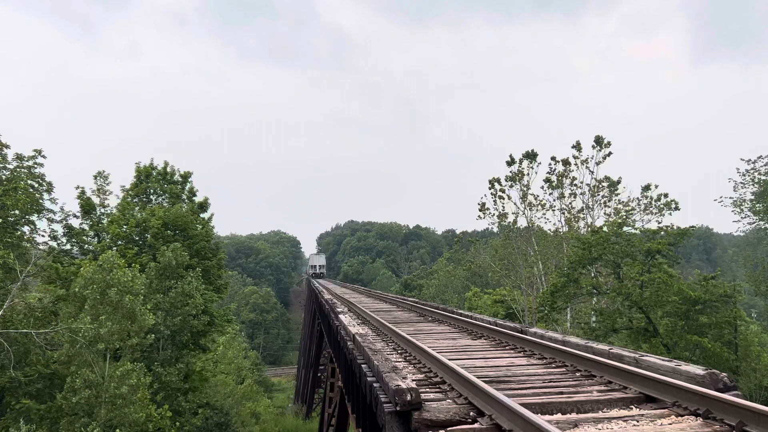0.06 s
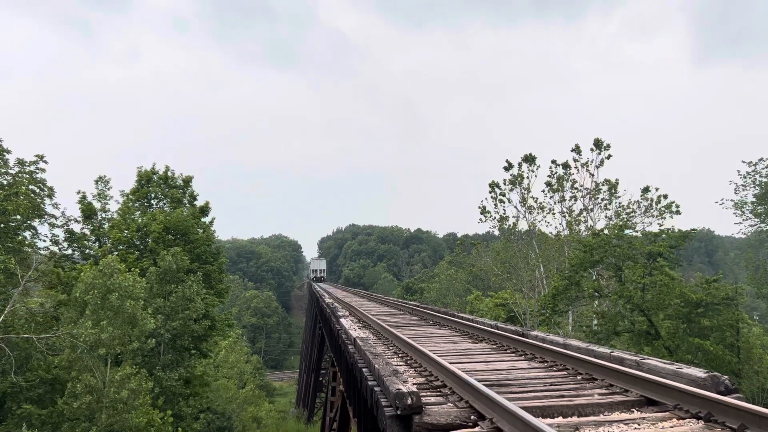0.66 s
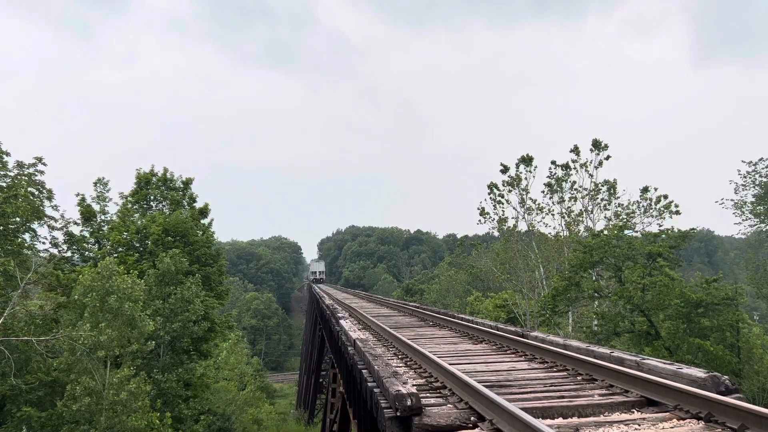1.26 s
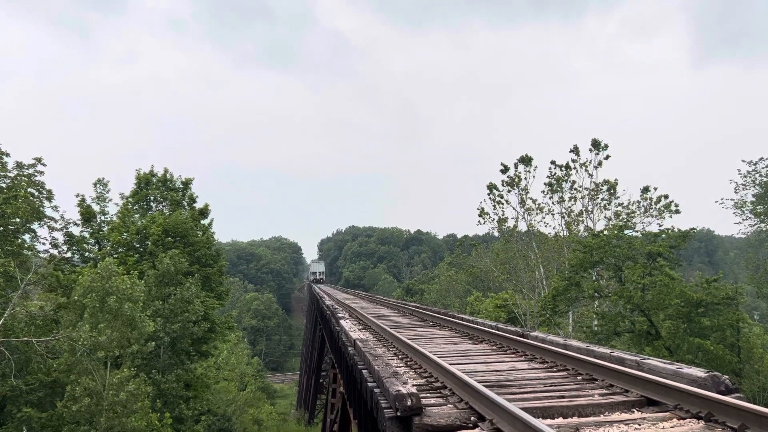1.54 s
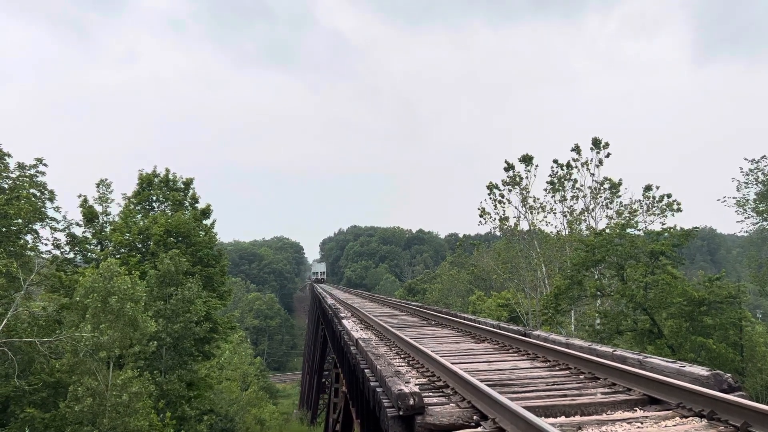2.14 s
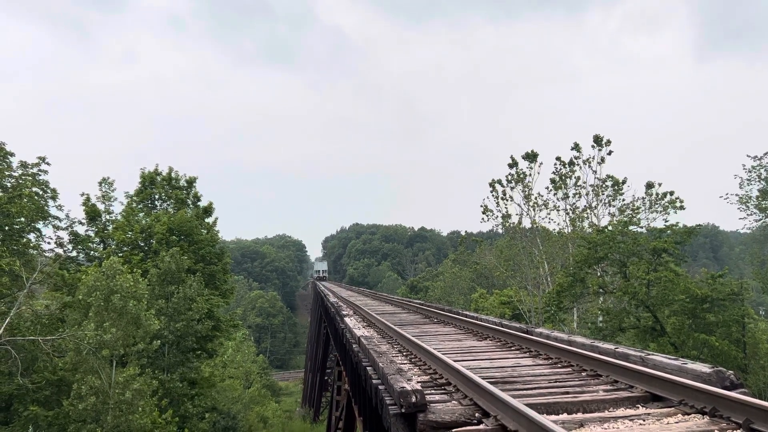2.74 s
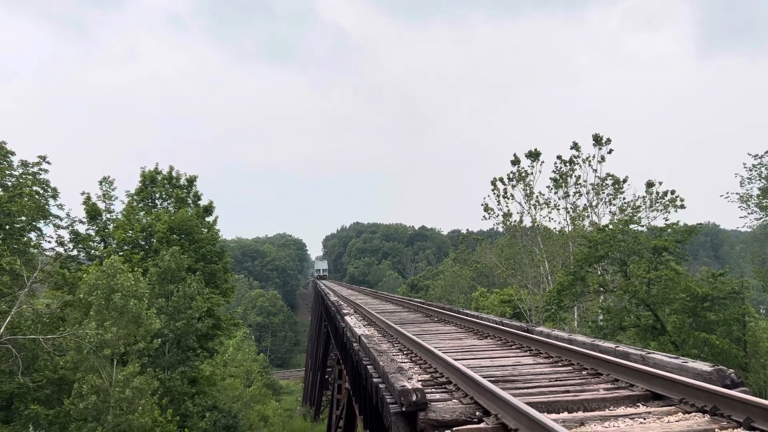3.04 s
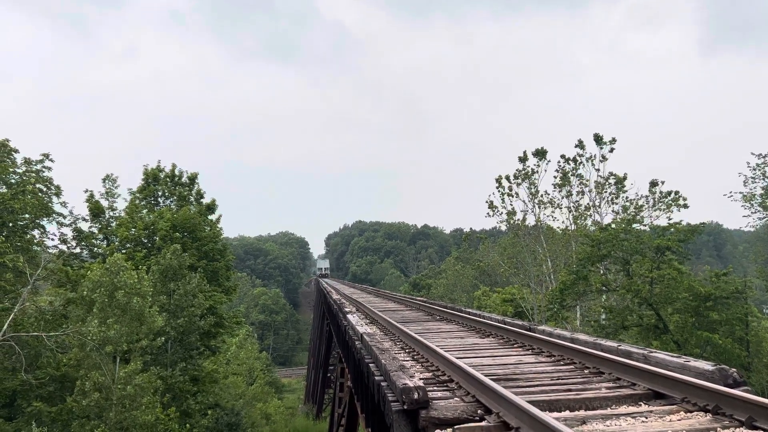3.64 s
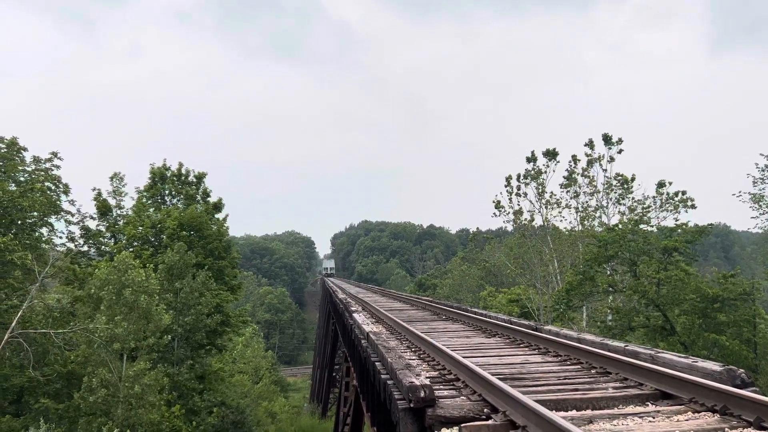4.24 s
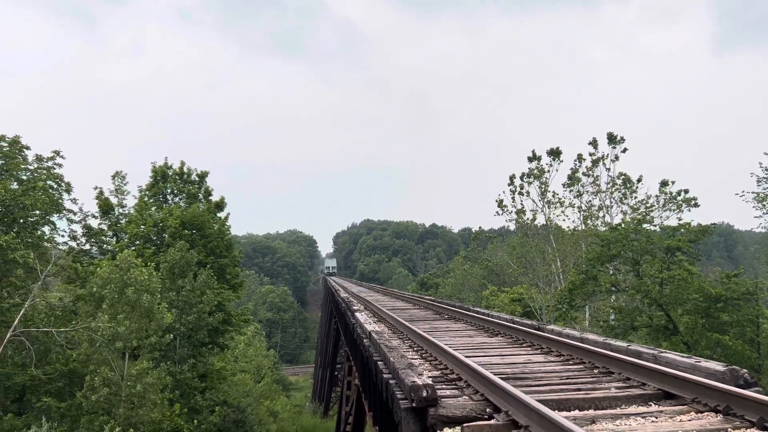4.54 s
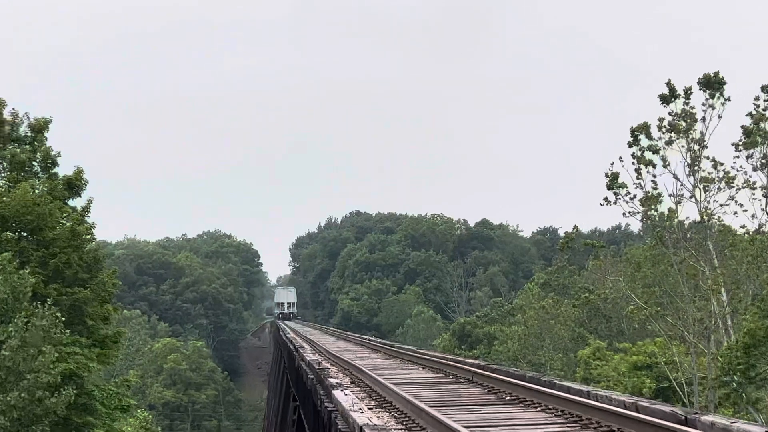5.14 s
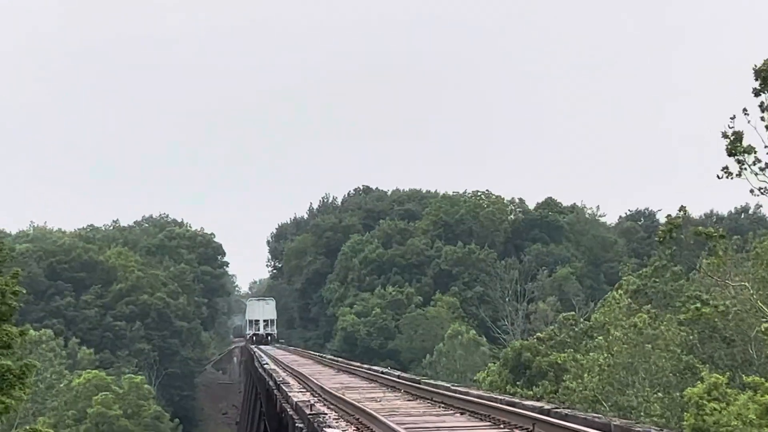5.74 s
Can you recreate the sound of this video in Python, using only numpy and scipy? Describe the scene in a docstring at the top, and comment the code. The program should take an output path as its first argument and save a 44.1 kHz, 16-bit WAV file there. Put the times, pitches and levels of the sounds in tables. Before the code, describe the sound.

Outdoors among trees, a hand-held microphone picks up the low, steady rumble and hiss of a far freight train, swelling twice. Faint metallic ringing, a few high pings and small bird chirps sit over it, with light wind buffeting close up. Late on, a sharp handling click sounds on the left, a sparrow begins a quiet, rapid trill, and the stereo picture narrows.

```python
"""A freight train rolls away beyond a steel trestle, heard outdoors from a distance on a hand-held camera.
The bridge rumbles, the wheels roar and squeal thinly, the rails ring faintly and give a few high pings.
Birds call in the trees and a sparrow starts a fast trill. Close up, over a faint hiss, a breeze buffets
the two microphone ports; the camera is tapped and bumped, then zooms in, narrowing its stereo picture."""
import sys
import numpy as np
from scipy import signal
from scipy.fft import rfft, irfft, next_fast_len
from scipy.io import wavfile
from scipy.ndimage import uniform_filter1d, map_coordinates

SR = 44100
rng = np.random.default_rng(int(sys.argv[2]) if len(sys.argv) > 2 else 0)


def store_wav(level_fs):
    """Save 16-bit WAV to argv[1]."""
    pcm = np.round(np.clip(np.atleast_2d(level_fs), -1, 1) * 32767)
    wavfile.write(sys.argv[1], SR, pcm.T.astype(np.int16))


N = 255339
TOP_HZ = 15700  # the camera's band limit


def amp(db):
    """Decibels to gain."""
    return 10 ** (np.asarray(db) / 20)


def unit(x):
    """Scaled to rms 1."""
    return x / np.sqrt(np.mean(x ** 2) + 1e-20)


def along(points, hz):
    """(f/Hz, value) points read on a log frequency axis."""
    f, v = np.transpose(points)
    return np.interp(np.log(hz + 1), np.log(f + 1), v)


def curves(rows, size=N):
    """One value per sample for each column after the time."""
    s, *cols = np.transpose(rows)
    return [np.interp(np.arange(size) / SR, s, c) for c in cols]


def wobble(per_s):
    """A smooth random curve with per_s knots a second."""
    return map_coordinates(rng.standard_normal(int(N * per_s / SR) + 4), [np.arange(N) * per_s / SR])


def fading(db, db_per_s):
    """A level in dB that falls steadily."""
    return db - db_per_s * np.arange(N) / SR


def swells(rows, floor_db):
    """Gain of bell-shaped swells (peak t/s, level/dB, rise/s, fall/s) over a floor."""
    t = np.arange(N) / SR
    power = sum(amp(db) ** 2 * np.exp(-((t - s) / np.where(t < s, rise, fall)) ** 2)
                for s, db, rise, fall in rows)
    return np.sqrt(power + amp(floor_db) ** 2)


def filtered(x, response):
    """x times a response of frequency."""
    m = next_fast_len(N + SR // 2)
    return irfft(rfft(x, m) * response(np.fft.rfftfreq(m, 1 / SR)), m)[..., :N]


def shaped(x, spectrum):
    """x through a curve of (f/Hz, gain/dB) points."""
    return filtered(x, lambda hz: amp(along(spectrum, hz)))


def noise(spectrum):
    """Mono noise of rms 1 with the given spectrum."""
    return unit(shaped(rng.standard_normal(N), spectrum))


def narrow(centre_hz, width_hz):
    """Stereo noise of rms 1 from one randomly driven resonance."""
    drive = rng.standard_normal((2, N))
    return unit(filtered(drive, lambda hz: 1 / (1 + (2 * (hz - centre_hz) / width_hz) ** 2)))


def evened(x, samples, floor):
    """Stereo x divided by its running rms, with a floor added to the power."""
    return x / np.sqrt(np.abs(uniform_filter1d(np.mean(x ** 2, axis=0), size=samples)) + floor)


def add(track, s, sound):
    """Mix a sound into a track from time s on."""
    start = round(s * SR)
    part = sound[..., max(-start, 0):max(N - start, 0)]
    track[..., max(start, 0):max(start, 0) + part.shape[-1]] += part


def rush(spectrum, resonances, patchy_db):
    """Distant stereo noise of rms 1 through resonances, with drifting patches of gain."""
    # likeness of far sound at the two ports: f/Hz, correlation/-1..1
    likeness = [(60, 0.99), (170, 0.97), (350, 0.88), (650, 0.44), (870, -0.11), (1100, 0.23),
                (1500, -0.17), (1850, 0.74), (2250, 0.5), (3100, -0.31), (5200, -0.43), (7000, 0.37)]
    spectra = signal.stft(rng.standard_normal((2, N)), nperseg=512)[2]
    patches = uniform_filter1d(rng.standard_normal(spectra.shape[1:]), size=5, axis=0)
    patches = unit(uniform_filter1d(patches, size=16, axis=1))
    pair = signal.istft(spectra * amp(patchy_db * patches), nperseg=512)[1][:, :N]

    def response(hz):
        peaks_db = sum(db / (1 + (2 * (hz - centre) / width) ** 2) for centre, width, db in resonances)
        turn = np.arccos(np.clip(along(likeness, hz), -1, 1)) / 2
        return amp(along(spectrum, hz) + peaks_db) * [np.cos(turn), np.sin(turn)]

    mid, side = filtered(pair, response)
    return unit(np.array([mid + side, mid - side]))


def train():
    """Many far wheels blend into the trestle's rumble, a rolling roar and the hiss of the rails."""
    # spectra of rumble, roar and rails: f/Hz, relative level/dB
    rumble_band = [(20, -41), (32, -8.5), (47, 0), (62, 5.5), (76, -0.5), (95, 0), (125, -4.5),
                   (180, -23.5), (400, -118)]
    roar_band = [(60, -7), (130, 1), (190, 2), (260, -1.5), (330, 0.5), (480, -2), (650, -4), (800, -9),
                 (1000, -6.5), (1500, -11), (2200, -41.5), (5000, -82.5)]
    rail_band = [(600, -7), (1100, -3.5), (1600, 2), (2000, -1.5), (2450, -4), (2900, -9.5), (3800, -13),
                 (4900, -15.5), (6000, -21), (7500, -30), (8300, -37), (9200, -70)]
    # resonances of the trestle and of wheels and rails: f/Hz, width/Hz, lift/dB
    trestle_modes = [(81, 26, 7.5), (108.3, 4.1, 8.5), (151, 18.5, 6), (216.1, 16.4, 5)]
    wheel_modes = [(2210, 28, 3.1), (2438, 35, 4.9), (2940, 23, 2.3), (3070, 70, 2), (3820, 80, 2.9),
                   (4400, 92, 1.4), (4960, 190, 3.5)]
    # the rumble surges as the load shifts: peak t/s, level/dB, rise/s, fall/s
    surges = [(1.6, -32.5, 0.15, 0.26), (4.88, -32, 0.17, 0.64)]
    recede_db_per_s, sway_db = 0.0569, 0.6
    load = swells(surges, floor_db=fading(-31.5, db_per_s=1.3)) * amp(sway_db * wobble(per_s=12))
    rumble = rush(rumble_band, trestle_modes, patchy_db=3.5)
    rumble = evened(rumble, samples=8000, floor=1e-6)  # the heavy deck evens out single axles' blows
    roar = rush(roar_band, trestle_modes, patchy_db=0.78)
    rails = rush(rail_band, wheel_modes, patchy_db=1.55)
    flutter = wobble(per_s=9)  # moving air on the long path to the microphone
    roar_db = fading(-38, recede_db_per_s) + 1.1 * flutter
    rail_db = fading(-46.5, recede_db_per_s) + 0.2 * flutter
    return load * rumble + amp(roar_db) * roar + amp(rail_db) * rails


def wheel_squeal():
    """Far wheels squeal thinly now and then, over one faint squeal that lingers."""
    # swells of squeal: peak t/s, level/dB, rise/s, fall/s, f/Hz, width/Hz
    squeals = [(.12, -62, .2, .18, 4750, 400), (.86, -74.5, .12, .2, 7748, 20),
               (1.13, -69, .11, .12, 4930, 90), (1.98, -78.5, .14, .14, 7748, 20),
               (2.2, -68, .1, .12, 4930, 90), (2.75, -68, .12, .12, 4930, 90)]
    out = amp(-86) * narrow(centre_hz=7748, width_hz=20)
    for s, db, rise, fall, hz, width_hz in squeals:
        out += swells([(s, db, rise, fall)], floor_db=-np.inf) * narrow(hz, width_hz)
    return out


def rail_ring():
    """Rolling keeps a few narrow modes of the steel ringing in uneven swells."""
    # one swell per mode: peak t/s, level/dB, rise/s, fall/s, width/Hz, left-right/dB
    rings = [(.17, -54, .3, 0.42, 16, -3), (1.57, -55.5, .35, 1.6, 32, 0.5), (2.7, -56.5, 2.8, 1.8, 24, 1)]
    # pitch of each mode: f/Hz
    ring_hz = [1820, 1852, 1822]
    sway_db = 1.2
    out = np.zeros((2, N))
    for (s, db, rise, fall, width_hz, pan_db), hz in zip(rings, ring_hz):
        ring = narrow(hz, width_hz)
        ring = ring + 0.17 * ring[::-1]  # each side shares a little of the other
        ring = unit(evened(ring, samples=2500, floor=0.08))  # many wheels drive it without a gap
        ring = unit(ring * amp(sway_db * wobble(per_s=7)))
        out += swells([(s, db, rise, fall)], floor_db=-69) * amp([[pan_db / 2], [-pan_db / 2]]) * ring
    return out


def hiss():
    """A faint high hiss that slowly fades."""
    # spectra shared and opposed between the ports: f/Hz, relative level/dB
    mid_band = [(2000, -10.5), (4500, 12), (7000, -9), (9200, -63), (10600, 9), (12800, 8), (14200, 0.5),
                (15600, -29)]
    side_band = [(7000, -40.5), (9000, -15.5), (9900, 1), (11000, -1.5), (12200, -19.5), (15500, -14.5)]
    pair = noise(mid_band) + amp(0.5) * noise(side_band) * np.array([[1], [-1]])
    return amp(fading(-64, db_per_s=0.5)) * pair


def pings():
    """Very high bursts run along the steel and reach each port differently; one tone rings longest."""
    # pings from the track: t/s, level/dB, rise/s, t60/s, held tone f/Hz, its relative level/dB
    bursts = [(-.04, -49.5, 0.03, 0.7, 13020, -5), (.045, -53.5, 0.0093, 0.5, 12963, -11),
              (1.18, -42, 0.012, 0.24, 13200, -11), (1.504, -48, 0.014, 0.15, 13200, -24)]
    # spectrum of a burst: f/Hz, relative level/dB
    band = [(10800, -56), (11800, -10), (12500, 0), (12800, -12), (13300, 0), (14200, 4), (14800, 1),
            (15400, -10), (15800, -28)]
    # modes that every ping rings: f/Hz, relative level/dB, t60/s
    steel_modes = [(12498, -19, .45), (12963, -20, .5), (13083, -18, .5), (13160, -17, .65),
                   (13289, -18, .6), (13503, -20, .4)]
    wash_db, wash_t60, held_t60, sizzle_db = -18, 1.1, 1.1, 2.5
    lag_s_per_hz = 6e-6  # lower parts of a burst travel slower and arrive later
    out, t = np.zeros((2, N)), np.arange(SR) / SR
    for s, db, rise, t60, held_hz, held_db in bursts:
        decay = amp(-60 * t / t60) + amp(wash_db - 60 * t / wash_t60)  # a wash lingers in the rail
        burst = np.array([noise(band)[:SR], noise(band)[:SR]]) * decay
        burst *= amp(sizzle_db * wobble(per_s=80)[:SR])
        ring = np.zeros((2, SR))
        for hz, mode_db, mode_t60 in list(steel_modes) + [(held_hz, held_db, held_t60)]:
            envelope = amp(mode_db + rng.normal(0, 1.4) - 60 * t / mode_t60)
            ring += envelope * np.sin(2 * np.pi * (hz * t + rng.random((2, 1))))
        add(out, s, amp(db) * (1 - np.exp(-t / rise)) * (burst + ring))
    return filtered(out, lambda hz: np.exp(1j * np.pi * lag_s_per_hz * (TOP_HZ - hz) ** 2))


def woods(x, t60, wet_db):
    """A sound from the trees, with their scattered echo at each port."""
    t = np.arange(SR // 2) / SR
    tail = rng.standard_normal((2, len(t))) * amp(-60 * t / t60)
    return x + amp(wet_db) * signal.fftconvolve(x[None], tail / np.linalg.norm(tail[0]), axes=1)[:, :N]


def chirps():
    """Birds in the trees give short, slightly quavering glides, alone or in fading phrases; among them a far
    wheel squeals thinly, a longer tone rising slowly near 6 kHz."""
    # single notes: t/s, length/s, start f/Hz, end f/Hz, level/dB
    notes = [(.69, 0.26, 5900, 6146, -60.5), (.885, .05, 3600, 3450, -57), (1.713, 0.022, 4400, 3350, -58),
             (1.902, .05, 4250, 3300, -54.5), (1.922, .03, 3750, 3250, -51), (1.94, .05, 3340, 3380, -57),
             (2.32, 0.064, 6200, 6600, -65.5)]
    # phrases of one repeated note: t/s, count, period/s, length/s, start f/Hz, end f/Hz, level/dB
    phrases = [(.005, 4, .0725, 0.018, 5000, 4400, -56), (4.454, 5, .0985, .024, 3500, 3930, -57.5)]
    fade_db_per_note = 1.1
    out = np.zeros(N)
    quaver = 1 + .013 * wobble(per_s=300)
    repeats = [(s + k * period, length, start_hz, end_hz, db - k * fade_db_per_note)
               for s, count, period, length, start_hz, end_hz, db in phrases
               for k in range(round(count))]
    for s, length, start_hz, end_hz, db in list(notes) + repeats:
        progress = np.linspace(0, 1, int(length * SR))
        glide_hz = start_hz + (end_hz - start_hz) * progress
        pitch_hz = glide_hz * np.roll(quaver, -round(s * SR))[:len(progress)]
        add(out, s, amp(db) * np.sin(np.pi * progress) * np.sin(2 * np.pi * np.cumsum(pitch_hz) / SR))
    return woods(out, t60=.3, wet_db=-4)


def breeze():
    """In each puff, eddies buffet each microphone port on its own and push the two against each other."""
    # spectrum of the buffeting: f/Hz, relative level/dB
    band = [(20, -43), (32, -14), (50, -11), (75, 4), (110, -11), (160, -14.5), (300, -33), (800, -89)]
    # puffs on the ports: peak t/s, level/dB, rise/s, fall/s, left-right/dB
    puffs = [(1.0, -33.5, 0.11, 0.13, -7.5), (1.35, -30, 0.14, 0.19, -2), (3.23, -37.5, 0.027, 0.077, -1.5),
             (4.04, -35, 0.09, 0.26, -4), (4.6, -41.5, 0.22, 0.39, 1)]
    calm_db = -54.5  # stir of the air between puffs
    eddies = np.array([noise(band), noise(band)])
    force = [swells([(s, db + side * pan_db / 2, rise, fall) for s, db, rise, fall, pan_db in puffs],
                    calm_db) for side in (1, -1)]
    return np.array(force) * unit(eddies - 0.43 * eddies[::-1])


def handling():
    """Soft bumps push both ports alike; taps crack and ring the camera's case near the left port."""
    # low bumps: t/s, level/dB, f/Hz, width/s
    bumps = [(1.323, -19.5, 76.4, 0.0061), (4.075, -21, 90, .007), (4.827, -14.5, 62, 0.0087)]
    # finger taps: t/s, click/dB, thud/dB, left-right/dB, pitch factor, crack/dB, crack edge f/Hz
    taps = [(4.0657, 3.5, -40, 12, 1.03, -43, 5300), (4.0791, -1.5, -23, 14, 1.2, -45, 15000),
            (4.0797, -6, -40, 4, .66, -53, 4500), (4.0925, -20, -45, 16, 1, -56, 4000)]
    # modes of the case: f/Hz, relative level/dB, t60/s
    case_modes = [(497, -19, 0.015), (954, 5.5, 0.0042), (1670, -5, 0.0039), (3420, -18, 0.0035),
                  (6250, -31, 0.001)]
    ring_rise_s, crack_t60, thud_t60, thud_hz = 0.0014, .004, 0.038, 85
    out, t = np.zeros((2, N)), np.arange(SR // 10) / SR
    from_peak = t - t.mean()
    for s, db, hz, width in bumps:
        bell = np.exp(-(from_peak / width) ** 2 / 2)
        add(out, s - t.mean(), amp(db) * bell * np.cos(2 * np.pi * hz * from_peak))
    for s, click_db, thud_db, pan_db, pitch, crack_db, edge_hz in taps:
        ring = sum(amp(db - 60 * t / t60) * np.sin(2 * np.pi * hz * pitch * t)
                   for hz, db, t60 in case_modes)
        click = amp(click_db) * ring * (1 - np.exp(-t / ring_rise_s)) ** 2
        crack = signal.lfilter(*signal.butter(2, edge_hz, fs=SR), rng.standard_normal(len(t)))
        crack *= amp(crack_db - 60 * t / crack_t60)
        thud = amp(thud_db - 60 * t / thud_t60) * np.sin(2 * np.pi * thud_hz * t)
        add(out, s, amp([[pan_db / 2], [-pan_db / 2]]) * (crack - click) - thud)
    return out


def trill():
    """A sparrow in the trees repeats one slightly husky syllable, louder and louder."""
    # the syllable, an arch and a falling sweep: t/s, f/Hz, relative level/dB
    syllable = [(0, 6400, -14), (.005, 6900, -3), (.010, 7200, -.5), (.018, 7150, -2), (.021, 6500, -9),
                (.025, 5800, -1.5), (.031, 5250, -.5), (.035, 4850, -4), (.040, 4600, 2.5),
                (.046, 4550, -8)]
    start_s, period_s, attack_s = 4.622, .0707, 0.064
    base_db, grows_db_per_s = -67, 6
    out = np.zeros(N)
    pitch_hz, shape_db = curves(syllable, size=SR // 20)
    quaver = 1 + .014 * wobble(per_s=500)
    for age in np.arange(0, N / SR - start_s, period_s):
        sung_hz = pitch_hz * quaver[round(age * SR):][:len(pitch_hz)] * (1 + rng.normal(0, .006))
        tone = np.sin(2 * np.pi * np.cumsum(sung_hz) / SR)
        effort = amp(base_db + grows_db_per_s * age) * (1 - np.exp(-age / attack_s))
        add(out, start_s + age, effort * amp(shape_db + rng.normal(0, 1.5)) * tone)
    return woods(out, t60=.32, wet_db=0)


def zoomed(x):
    """Zooming in narrows the stereo picture, least in the midrange, and favours the treble ahead."""
    # course of the zoom: t/s, side/dB, treble/dB, midrange/dB
    zoom = [(0, -0.5, 0.5, 0), (4.8, -3, -4, -0.5), (4.95, -13.5, 0, -5), (5.15, -20, 4, -3),
            (5.79, -27, 3, -5)]
    side_db, treble_db, midrange_db = curves(zoom)
    mid, side = (x[0] + x[1]) / 2, (x[0] - x[1]) / 2
    stays_wide = shaped(side, [(350, -6.5), (800, -8.0), (1700, 1.0), (2400, -12.5), (3800, -38.0)])
    treble = shaped(mid, [(2500, -26.5), (3800, -5.5)])
    midrange = shaped(mid, [(400, -44.5), (900, -3.5), (1500, -12.5), (2200, 4), (3500, -14.0)])
    mid = mid + (amp(treble_db) - 1) * treble + (amp(midrange_db) - 1) * midrange
    side = stays_wide + amp(side_db) * (side - stays_wide)
    return np.array([mid + side, mid - side])


def scene():
    """Far train, track and birds through the microphone's ports and zoom, plus the noises close up."""
    # the two ports colour the sound differently: f/Hz, left-right/dB
    ports = [(200, 1.5), (380, 0), (700, -3), (1050, 2), (1400, 1), (1900, -2), (2400, -3), (3200, -0.5),
             (4500, 4.5), (8000, -1)]
    outdoors = train() + wheel_squeal() + rail_ring() + pings() + trill() + chirps()
    ported = filtered(outdoors, lambda hz: amp(along(ports, hz) * np.array([[1], [-1]]) / 2))
    return zoomed(ported) + breeze() + handling() + hiss()


def record(dry):
    """The camera keeps nothing above its band limit."""
    return filtered(dry, lambda hz: hz < TOP_HZ)


dry = scene()
out = record(dry)
store_wav(out)
```